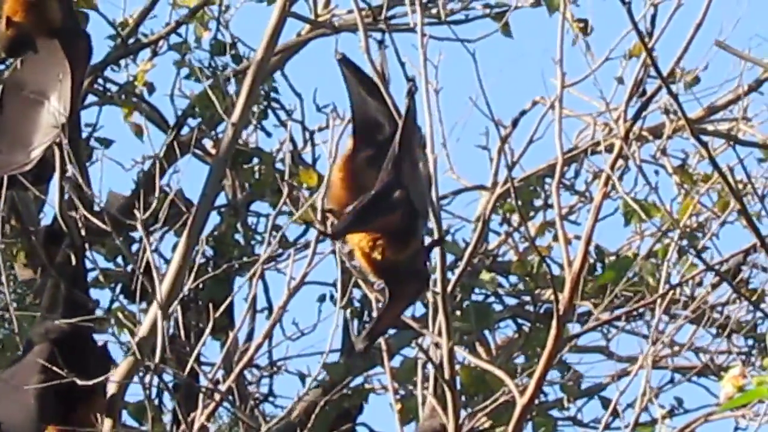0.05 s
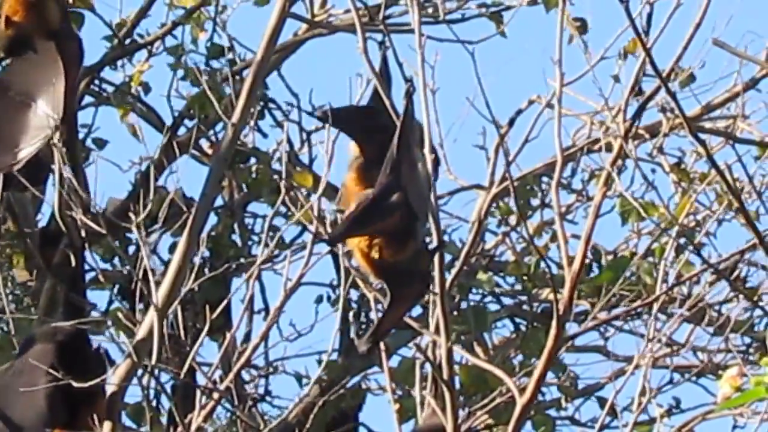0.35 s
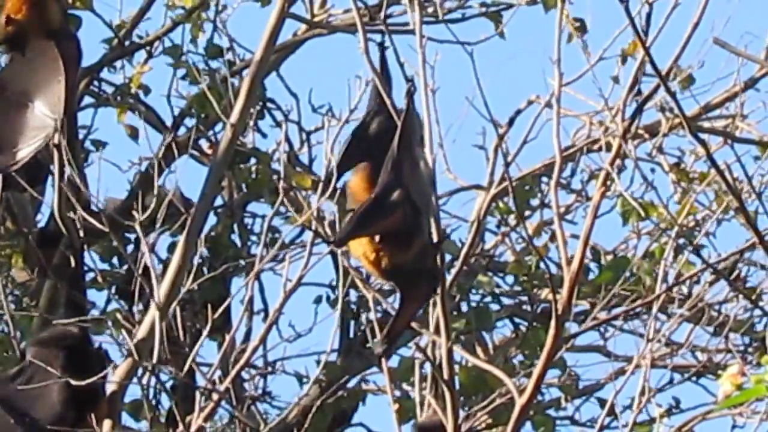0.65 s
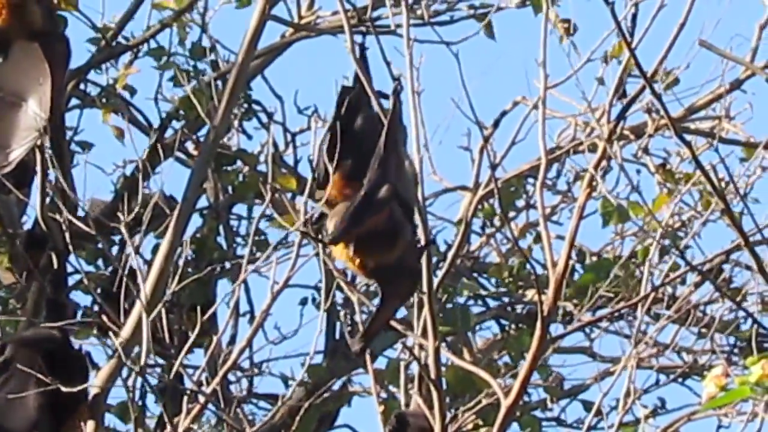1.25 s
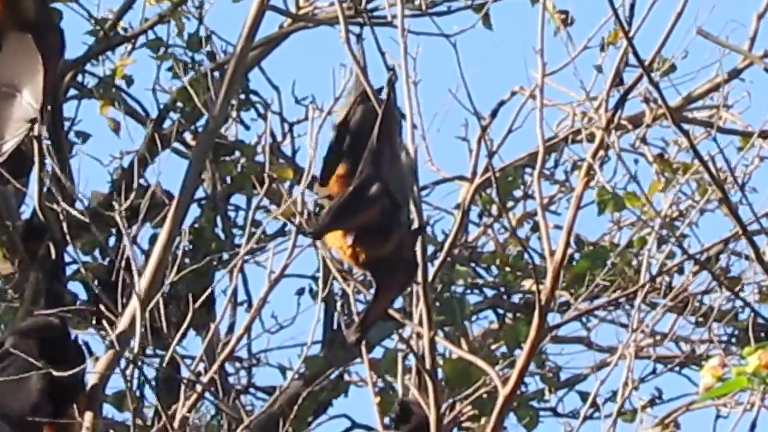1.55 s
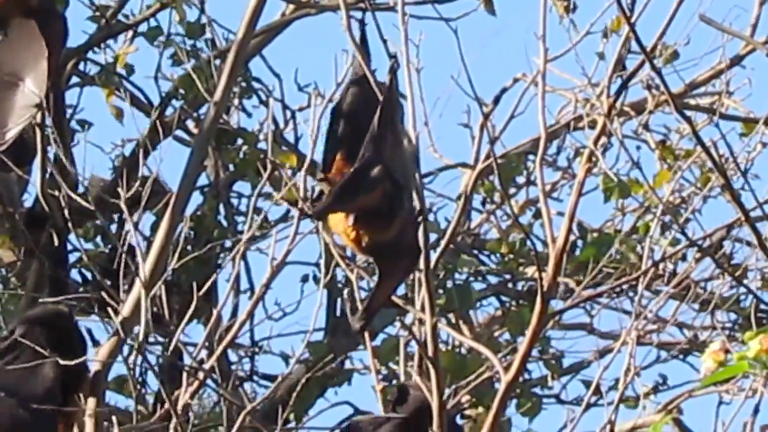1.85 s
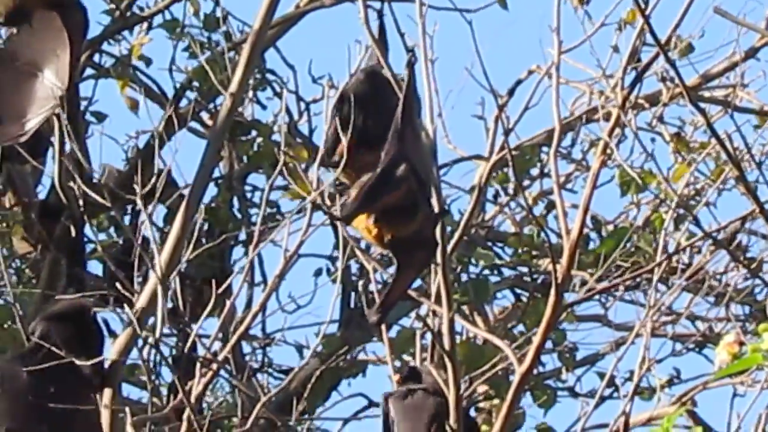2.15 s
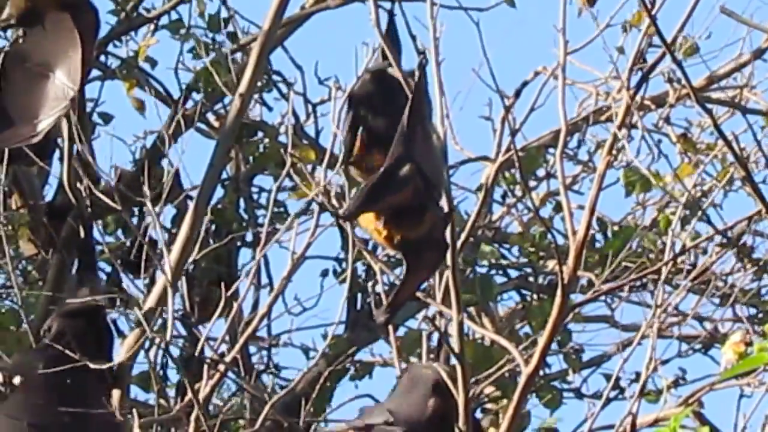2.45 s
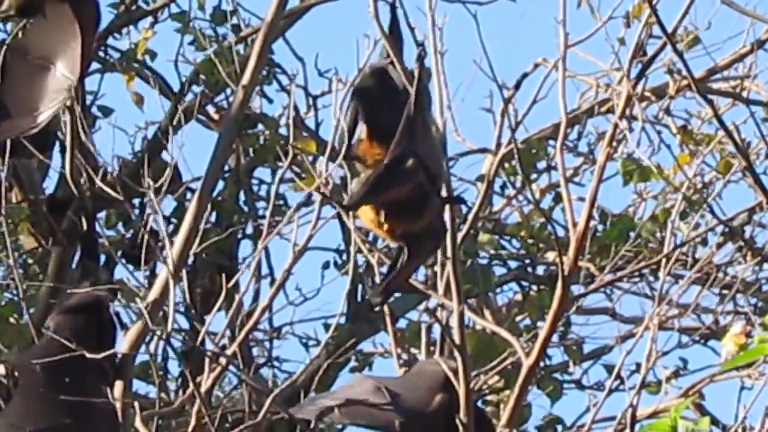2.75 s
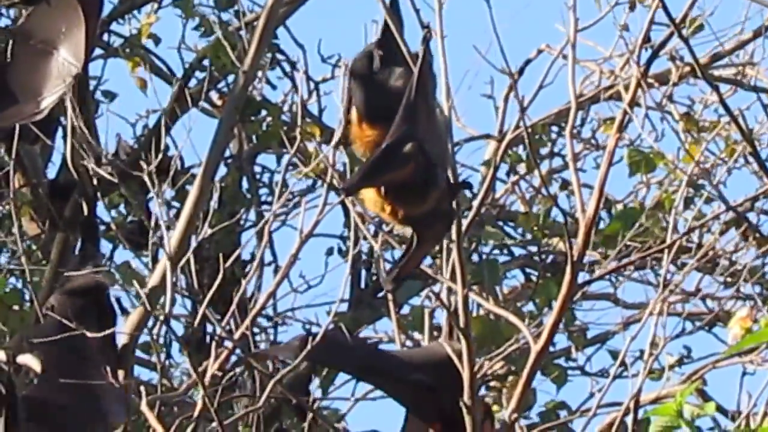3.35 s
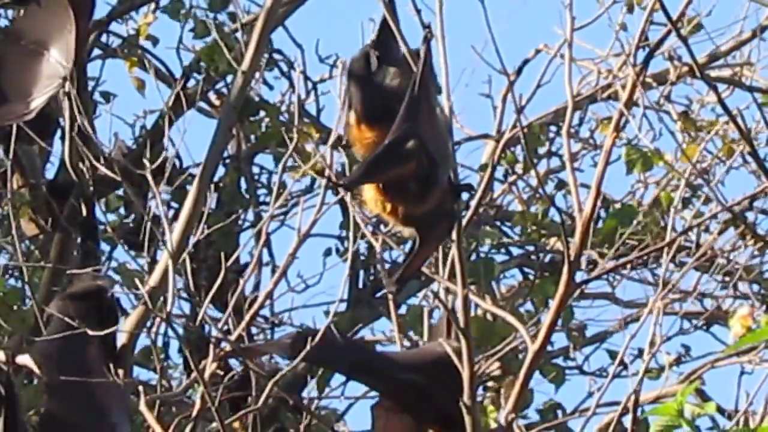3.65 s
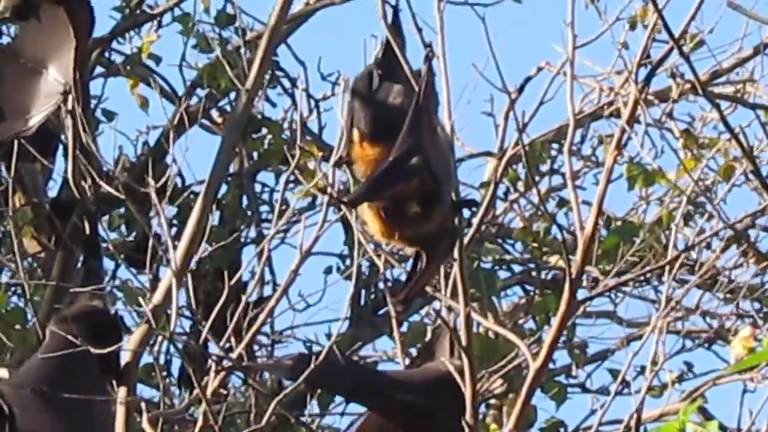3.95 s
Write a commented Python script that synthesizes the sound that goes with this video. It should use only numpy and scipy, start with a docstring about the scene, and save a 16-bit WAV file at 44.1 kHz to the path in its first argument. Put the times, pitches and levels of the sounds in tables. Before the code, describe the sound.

Fruit bats call in a roost tree, their din all around over a low outdoor rumble. Farther bats squeal, squawk and churr in front for the first 1.4 seconds. Then one close on the right screeches, high and rasping, until 1.8 seconds, chatters in short grunts, and screeches again from 2.7 to 3.2. Another answers in front with a brief rattling hiss, followed by faint squeals.

```python
"""First comes the din of a flying fox colony in its roost tree, wide around the microphone over a low rumble.
Farther bats squeal, squawk and churr from the front. Close on the right one bat screeches twice, its voice
breaking between thin squeal and harsh rasp, and chatters in between, each grunt ringing its mouth.
Another answers from the front with a hiss of air and rattling throat. The trees scatter every call."""
import sys
import numpy as np
from scipy import signal
from scipy.fft import rfft, irfft, next_fast_len
from scipy.io import wavfile
from scipy.ndimage import uniform_filter1d, map_coordinates

SR = 44100
rng = np.random.default_rng(int(sys.argv[2]) if len(sys.argv) > 2 else 0)


def persist_wave(psi):
    """Save psi, clipped to +-1, as 16-bit WAV."""
    counts = np.round(np.clip(psi, -1, 1) * 32767).astype(np.int16)
    wavfile.write(sys.argv[1], SR, np.atleast_2d(counts).T)


N = 176400
BAND_LIMIT_HZ = 15780
EARS = np.array([[.5], [-.5]])  # share of a left-right difference that each channel takes


def amp(db):
    """Decibels to gain."""
    return 10 ** (np.asarray(db) / 20)


def unit(x):
    """Scale to rms 1."""
    return x / np.sqrt(np.mean(x ** 2) + 1e-20)


def along(points, hz):
    """Read (f/Hz, value) points on a log frequency axis."""
    f, v = np.transpose(points)
    return np.interp(np.log(hz + 1), np.log(f + 1), v)


def clock():
    """Time of each sample in seconds."""
    return np.arange(N) / SR


def curves(rows):
    """One value per sample for each column after the time."""
    times, *columns = np.transpose(rows)
    return [np.interp(clock(), np.sort(times), column) for column in columns]


def gate(start, end, edge):
    """Open from start to end, with soft edges."""
    return np.clip(np.minimum(clock() - start, end - clock()) / edge + .5, 0, 1)


def wobble(rate):
    """A smooth random curve, rate knots a second."""
    return map_coordinates(rng.standard_normal(N // 8), [clock() * rate], mode="wrap")


def filtered(x, response):
    """Pass x through a complex response of frequency."""
    size = next_fast_len(N + SR // 2)
    return irfft(rfft(x, size) * response(np.fft.rfftfreq(size, 1 / SR)), size)[..., :N]


def shaped(x, spectrum):
    """Colour x with a spectrum, at rms 1."""
    return unit(filtered(x, lambda hz: amp(along(spectrum, hz))))


def noise(spectrum):
    """Coloured noise of rms 1."""
    return shaped(rng.standard_normal(N), spectrum)


# Width of the background at the microphone: f/Hz, side over mid/dB
FIELD_WIDTH = [(80, -12), (1200, -7), (3400, -2), (5000, -5.5), (8500, 1)]
# Its lean to one side: f/Hz, left over right/dB
FIELD_BALANCE = [(100, .5), (3000, -2), (4200, 3.5), (7000, 0)]


def diffuse(spectrum, patchy_db):
    """Noise from all around the microphone, its level patchy in time and frequency."""
    bins = signal.stft(rng.standard_normal((2, N)), nperseg=512)[2]
    patches = uniform_filter1d(rng.standard_normal(bins.shape[1:]), 4, axis=0)
    patches = unit(uniform_filter1d(patches, 6, axis=1))
    pair = signal.istft(bins * amp(patchy_db * patches), nperseg=512)[1][:, :N]
    mid = filtered(pair[0], lambda hz: amp(along(spectrum, hz)))
    side = filtered(pair[1], lambda hz: amp(along(spectrum, hz) + along(FIELD_WIDTH, hz)))
    stereo = np.array([mid + side, mid - side]) / mid.std()
    return filtered(stereo, lambda hz: amp(along(FIELD_BALANCE, hz) * EARS))


# The colony, far off on all sides: t/s, body level/dB, treble level/dB
COLONY_LEVELS = [(0, -42.5, -45.5), (.07, -46, -52.5), (.13, -45.5, -47), (.45, -51, -53),
                 (.58, -40, -44.5), (.94, -46, -49.5), (1.3, -48.5, -43), (1.85, -46.5, -47.5),
                 (2.25, -50, -49), (3.4, -43.5, -45), (3.8, -43.5, -42), (3.95, -37.5, -37)]
# Spectra of its body and its treble: f/Hz, gain/dB
COLONY_BODY = [(1000, -12), (1800, 3), (2350, 11.5), (2900, 14), (3600, 5), (5000, -20)]
COLONY_TREBLE = [(2500, -22), (3900, 6.5), (8200, 2.5), (9500, -5), (12000, -8), (15500, -33)]


def colony(flutter_db):
    """Many distant voices merge into a restless din."""
    body_db, treble_db = curves(COLONY_LEVELS)
    body = amp(body_db + flutter_db * wobble(70)) * diffuse(COLONY_BODY, patchy_db=3)
    treble = amp(treble_db + .7 * wobble(60)) * diffuse(COLONY_TREBLE, patchy_db=1.2)
    return body + treble


# Distant rumble in the open air: f/Hz, gain/dB
RUMBLE_SPECTRUM = [(25, -16), (55, 3), (95, -1), (490, -13), (730, -10.5), (1700, -17), (3200, -63)]


def rumble(level_db=-45, drone_hz=101.8, drone_db=-53.5):
    """Low outdoor rumble with a wavering drone, as of far traffic."""
    phase = 2 * np.pi * np.cumsum(drone_hz + 4 * wobble(14)) / SR
    drone = unit(np.sin(phase) * amp(3.2 * wobble(4.8)))
    return amp(level_db) * diffuse(RUMBLE_SPECTRUM, patchy_db=1) + amp(drone_db) * drone


# Farther bats and birds, in front: t/s, length/s, first f/Hz, last f/Hz, level/dB, second harmonic/dB
FAR_SQUEALS = [(0.092, 0.049, 2525, 2390, -38.5, -12.5), (0.637, 0.046, 2050, 2134, -32, -33),
               (0.692, 0.057, 2055, 2056, -36, -26), (2.698, 0.54, 749, 649.5, -52.5, -13),
               (3.195, 0.06, 2694, 3015, -36.5, -10), (3.463, .14, 2640, 2530, -44, -1.5),
               (3.713, 0.036, 7220, 7690, -36.5, -30)]


def squeals(quaver_hz, flutter_db, fade_db, pitch_arch=.0284):
    """Quavering tones that arch in mid call; each has its own second harmonic level, and each higher overtone
    is fade_db weaker than the one below."""
    out = np.zeros(N)
    quaver = quaver_hz * wobble(200)
    flutter = unit(amp(flutter_db * wobble(130)))
    for start, length, first_hz, last_hz, db, second_db in FAR_SQUEALS:
        span = np.flatnonzero((clock() > start) & (clock() < start + length))
        progress = np.linspace(0, 1, len(span))
        arch = np.abs(np.sin(np.pi * progress))
        glide = first_hz + (last_hz - first_hz) * progress
        pitch = glide * (1 + pitch_arch * (arch - .5)) + quaver[span]
        phase = 2 * np.pi * np.cumsum(pitch) / SR
        overtones = sum(amp(second_db - fade_db * (k - 2)) * np.sin(k * phase)
                        for k in range(2, 6) if k * first_hz < BAND_LIMIT_HZ)
        out[span] += amp(db) * np.sqrt(2 * arch) * flutter[span] * (np.sin(phase) + overtones)
    return out


# Squawks of farther bats, in front: centre t/s, half length/s, level/dB
FAR_SQUAWKS = [(0.438, 0.028, -42), (0.856, 0.011, -36.5), (0.998, 0.014, -39), (1.062, 0.0057, -33.5),
               (1.285, 0.0086, -35), (1.353, 0.025, -38.5), (3.786, 0.046, -47)]


def squawks(flutter_db):
    """Short rasping swells through one mouth resonance."""
    swell = sum(amp(db) * np.exp(-.5 * ((clock() - t) / half) ** 2) for t, half, db in FAR_SQUAWKS)
    return swell * unit(amp(flutter_db * wobble(300))) * noise(COLONY_BODY)


# A bat's throat and mouth, for the churr in front and the close screeches: f/Hz, gain/dB
BAT_THROAT = [(600, -29.5), (1650, -5), (2150, 1), (3350, 9), (3850, -4), (4400, 5.5), (5100, 2.5),
              (6100, -4), (8200, -6), (9200, -0.5), (10500, -7), (15500, -27)]


def churr(centre_s=.78, half_s=.13, rate_hz=72, level_db=-44):
    """A purring quarrel: a swelling run of quick rasping pulses."""
    cycle = np.cumsum(rate_hz + 10 * wobble(22)) / SR % 1
    pulses = unit(np.sin(np.pi * cycle) ** 4)
    swell = np.exp(-.5 * ((clock() - centre_s) / half_s) ** 2)
    return amp(level_db) * swell * pulses * noise(BAT_THROAT)


# The bat close on the right: t/s, pitch f/Hz, level/dB, roughness (full at 1)
FIRST_SCREECH = [(1.36, 1897, -44.5, .2), (1.44, 1743, -34.5, 0.65), (1.452, 2294, -28.5, 1.1),
                 (1.51, 2183, -28, 1.08), (1.53, 2356, -29.5, 1.16), (1.575, 2422, -30, 0.83),
                 (1.583, 2210, -26, .65), (1.638, 2300, -28, .7), (1.652, 2090, -28.5, .3),
                 (1.69, 2150, -27, .4), (1.718, 2480, -26.5, .22), (1.77, 2558, -25, 0.15)]
SECOND_SCREECH = [(2.72, 2484, -31.5, 0.68), (2.745, 2477, -27.5, 0.684), (2.768, 2387, -31, 0.78),
                  (2.772, 3715, -32, 0.97), (2.812, 3642, -32.5, 0.53), (2.826, 3080, -34.5, 0.89),
                  (2.853, 2837, -34.5, 0.99), (2.859, 2582, -29, 0.18), (2.888, 2470, -32, 0.19),
                  (2.912, 2680, -33, .5), (2.915, 3650, -34, .35), (2.931, 3550, -35, .5),
                  (2.934, 2860, -34, .3), (2.98, 2833, -32.5, 0.096), (3.015, 2600, -34, 0.76),
                  (3.043, 2767, -37, 0.956), (3.049, 3617, -32.5, 0.043), (3.075, 3480, -36.5, 0.14),
                  (3.128, 3594, -31.5, 0.021), (3.134, 2927, -45, 0.16), (3.18, 2530, -29.5, .1)]
BITE_HZ, BITE_HALF_WIDTH_HZ, BITE_DB = 5675, 200, 22.5  # narrow mouth resonance
JITTER, ROUGH_JITTER, LURCH = .009, .016, .0362  # fractions of the pitch


def screech(rows, treble_db, second_db, rasp_db, subharmonic_db=2):
    """A very high voice: as it roughens its pitch lurches, its period doubles and it smears into rasp."""
    def throat(hz):
        shelf = np.clip(np.log2(hz / BITE_HZ + 1e-9), 0, 1)
        return amp(along(BAT_THROAT, hz) + treble_db * shelf)

    pitch, level_db, rough = curves(rows)
    rough = np.clip(rough, 0, 1)
    jitter = (JITTER + ROUGH_JITTER * rough ** 2) * wobble(900)
    lurch = LURCH * rough ** 2 * wobble(130)
    pitch = pitch * (1 + jitter + lurch)
    phase = 2 * np.pi * np.cumsum(pitch) / SR
    # the second harmonic flares as it sweeps through the mouth resonance
    bite_db = BITE_DB / (1 + ((2 * pitch - BITE_HZ) / BITE_HALF_WIDTH_HZ) ** 2)
    harmonics = [(k, amp(second_db + bite_db) if k == 2 else 1) for k in range(1, 7)]
    subharmonics = [(k + .5, amp(subharmonic_db) * rough ** 1.5) for k in range(6)]
    partials = [(k, gain * throat(k * pitch)) for k, gain in harmonics + subharmonics]
    tone = sum(gain * amp(2.5 * wobble(170)) * np.sin(k * phase + rough * wobble(800))
               for k, gain in partials)
    tone /= np.sqrt(sum(gain ** 2 for _, gain in partials) / 2)
    pulsed_air = rng.standard_normal(N) * (1 + np.cos(phase))
    rasp = unit(filtered(pulsed_air, throat))
    voice = np.sqrt(1 - .5 * rough) * tone + np.sqrt(rough) * amp(rasp_db) * rasp
    return voice * amp(level_db + 2 * rough * wobble(260)) * gate(rows[0][0], rows[-1][0], .02)


# Grunts of the same close bat: t/s, relative level/dB
GRUNTS = [(1.918, -25.5), (1.95, -25.5), (2.3368, -25), (2.383, -26), (2.4247, -31), (2.4407, -25),
          (2.481, -26.5), (2.5007, -27), (2.522, -29.5), (2.543, -22.5), (2.5837, -24.5), (2.633, -22),
          (3.363, -24), (3.375, -25)]
# Breath through its mouth: f/Hz, gain/dB
GRUNT_MOUTH = [(1400, -17), (2450, 2), (3500, -26), (13000, -45)]


def chatter(ring_hz=2540, rise_s=.0022, breathiness=.71, gain_db=-10):
    """Single grunts of the throat in quick runs, each ringing the mouth."""
    out = np.zeros(N)
    breath = breathiness * noise(GRUNT_MOUTH)
    for start, db in GRUNTS:
        age = np.maximum(clock() - start, 0)
        ring = np.sin(2 * np.pi * ring_hz * (1 + .03 * rng.standard_normal()) * age)
        envelope = age / rise_s * np.exp(1 - age / rise_s)
        out += amp(db + gain_db) * envelope * (ring + breath)
    return out


# The answering bat, in front of the microphone: t/s, body level/dB, treble level/dB
HISS_LEVELS = [(3.152, -52, -58), (3.165, -53, -34), (3.235, -33, -36), (3.26, -29, -35),
               (3.296, -40.5, -47), (3.321, -30.5, -37.5), (3.359, -46, -48)]
# Body and treble of its open mouth: f/Hz, gain/dB
MOUTH_BODY = [(700, -26), (1400, -1), (2900, 13.5), (4700, 11), (7500, -37)]
MOUTH_TREBLE = [(4000, -9.5), (5800, 4.5), (8100, 13), (9200, -16), (12500, 0), (15500, -35)]


def hiss(flutter_db, rattle_hz=697, jitter=.1105, breathiness=1.5):
    """A harsh shriek: an unsteady rattle of the throat, mixed with air, through the open mouth."""
    body_db, treble_db = curves(HISS_LEVELS)
    phase = 2 * np.pi * np.cumsum(rattle_hz * (1 + jitter * wobble(400))) / SR
    rattle = unit(sum(np.cos(k * phase) for k in range(1, 20)))
    source = rattle + breathiness * rng.standard_normal(N)
    voice = amp(body_db) * shaped(source, MOUTH_BODY) + amp(treble_db) * shaped(source, MOUTH_TREBLE)
    flutter = unit(amp(flutter_db * wobble(600)))
    return voice * flutter * gate(HISS_LEVELS[0][0], HISS_LEVELS[-1][0], .012)


def place(x, pan_db, lag_us, wet_db, t60_s=.31):
    """A caller's direction (left over right, delay of the left channel) and its scatter among the trees."""
    direct = filtered(x, lambda hz: amp(pan_db * EARS) * np.exp(-2j * np.pi * hz * EARS * lag_us / 1e6))
    tail = rng.standard_normal((2, SR // 2)) * amp(-60 * clock()[:SR // 2] / t60_s)
    scatter = signal.fftconvolve(x[None], tail / np.linalg.norm(tail[0]), axes=1)[:, :N]
    return direct + amp(wet_db) * scatter


def scene():
    """The roost from the microphone: one bat close on the right, others in front, the colony all around."""
    near = screech(FIRST_SCREECH, treble_db=1, second_db=1.5, rasp_db=-8.5)
    near += screech(SECOND_SCREECH, treble_db=-9, second_db=-6.5, rasp_db=-6)
    far = squeals(quaver_hz=45, flutter_db=3, fade_db=5)
    right = place(near + chatter(), pan_db=-7.5, lag_us=63.7, wet_db=-6.5)
    quarrel = hiss(flutter_db=2.5) + squawks(flutter_db=1.5) + churr()
    front = place(quarrel + far, pan_db=-1, lag_us=-5, wet_db=-4)
    return right + front + colony(flutter_db=1.5) + rumble()


def record(dry):
    """The camera keeps nothing above its band limit."""
    return filtered(dry, lambda hz: hz < BAND_LIMIT_HZ)


dry = scene()
out = record(dry)
persist_wave(out)
```